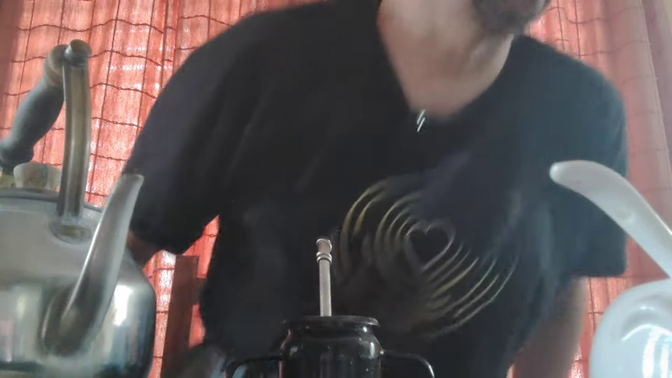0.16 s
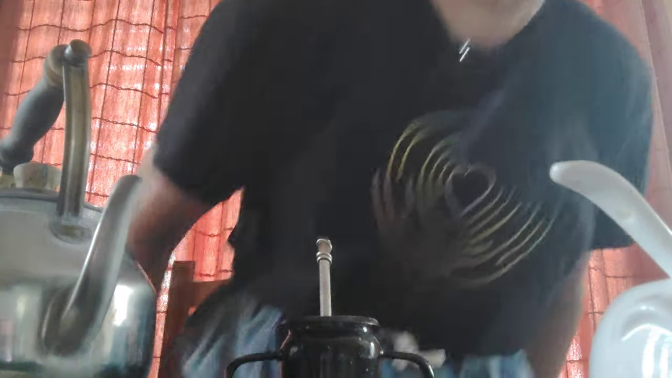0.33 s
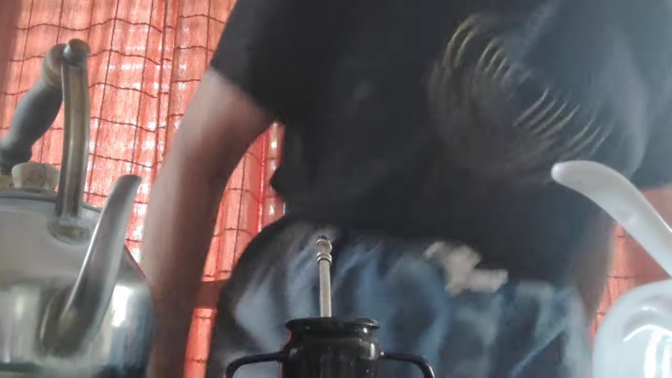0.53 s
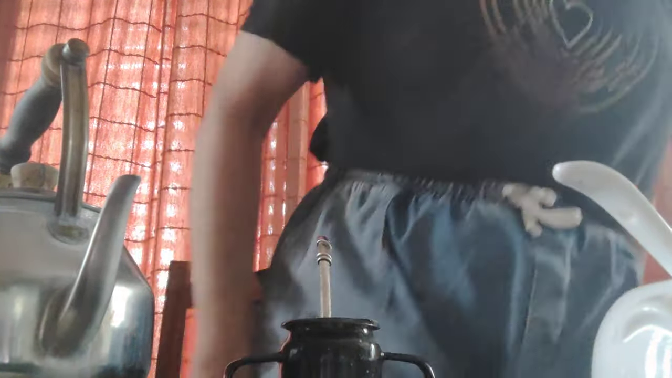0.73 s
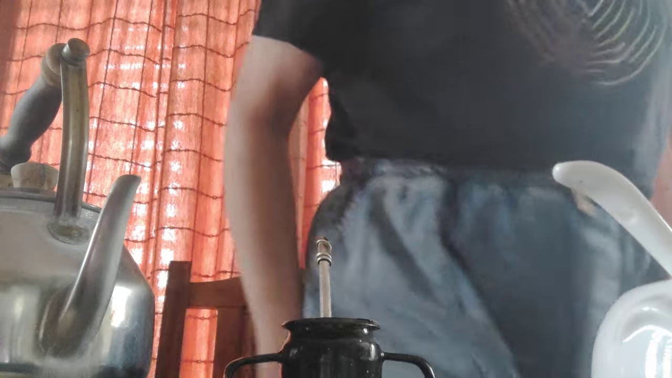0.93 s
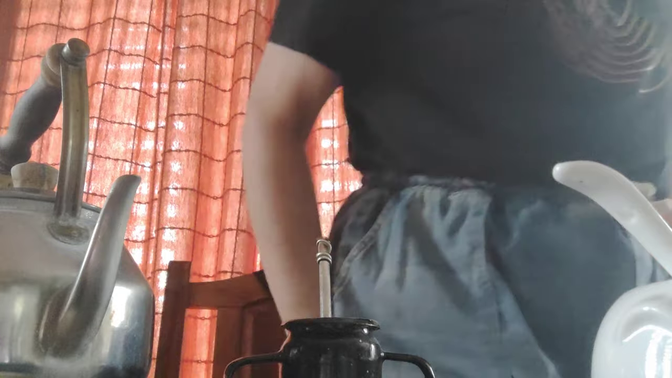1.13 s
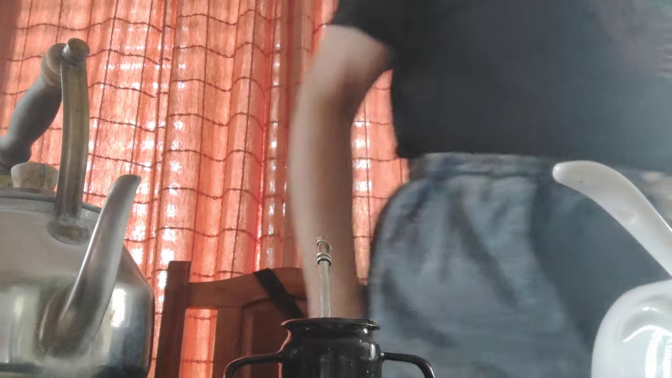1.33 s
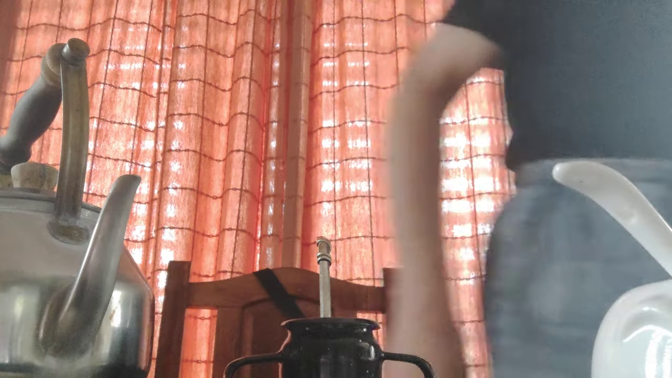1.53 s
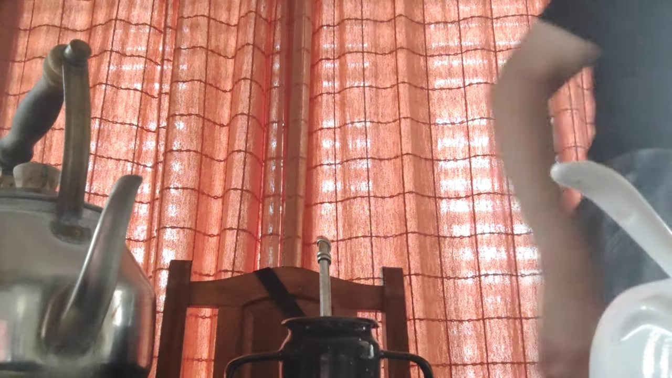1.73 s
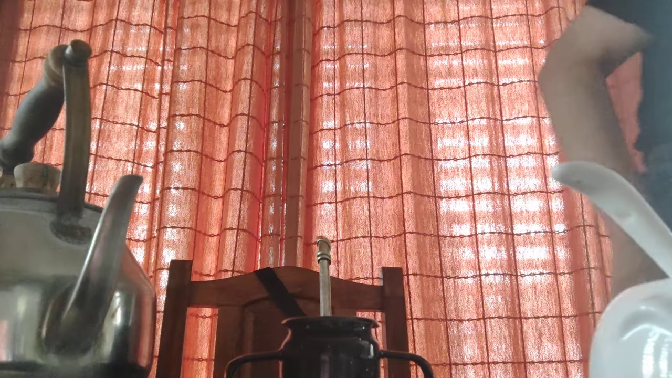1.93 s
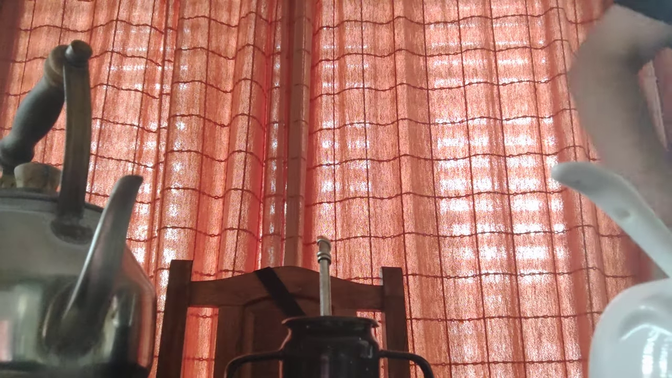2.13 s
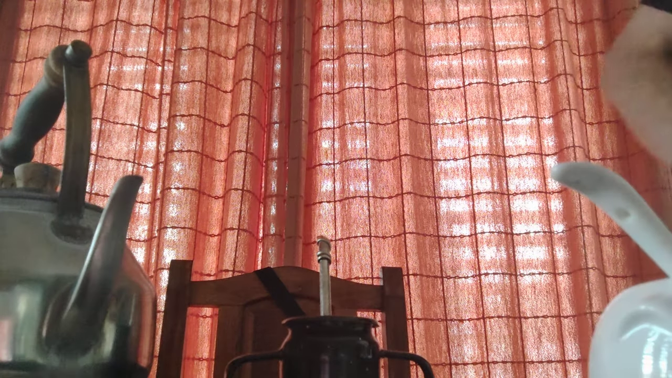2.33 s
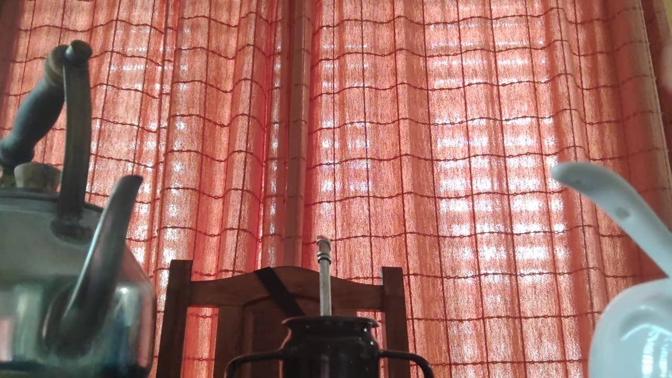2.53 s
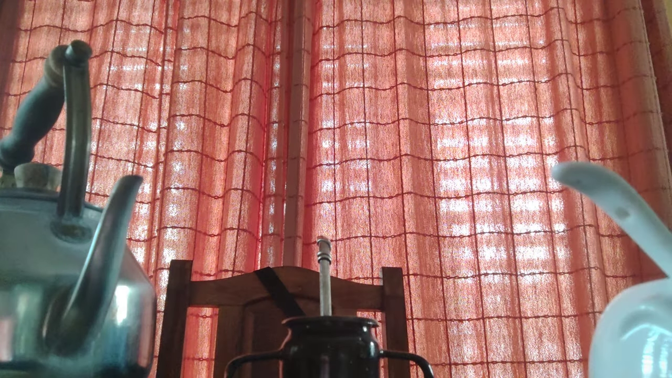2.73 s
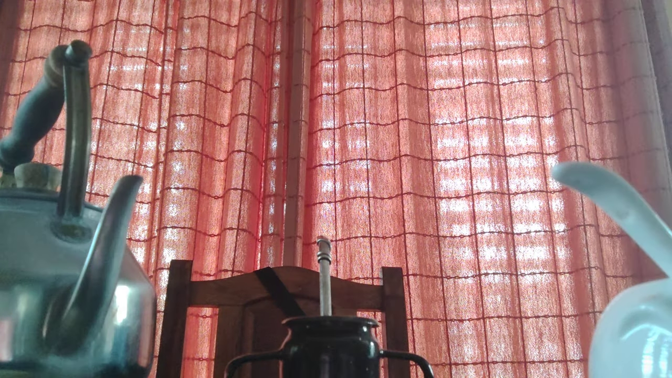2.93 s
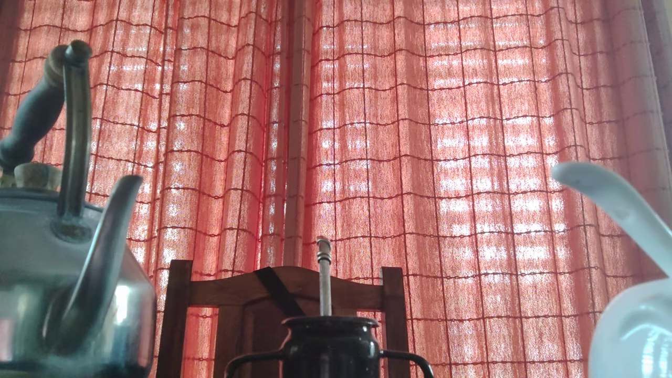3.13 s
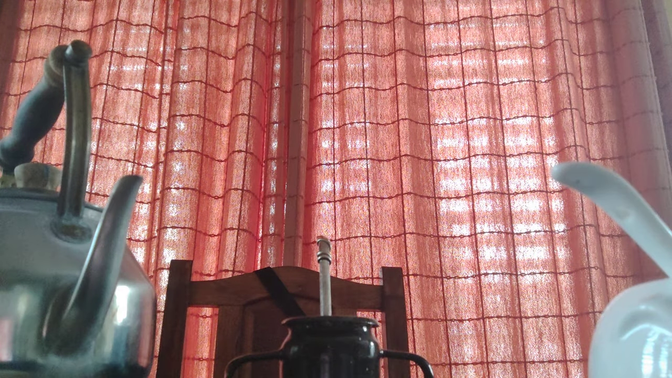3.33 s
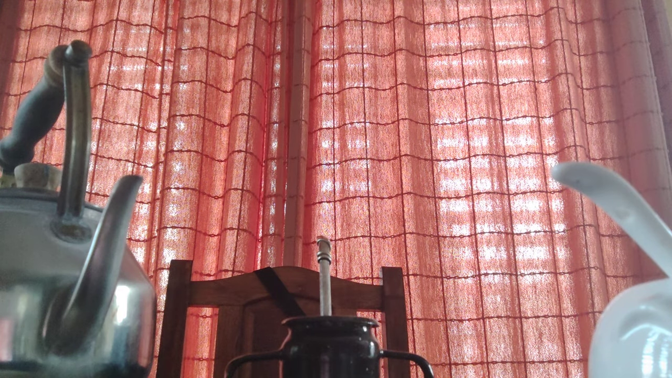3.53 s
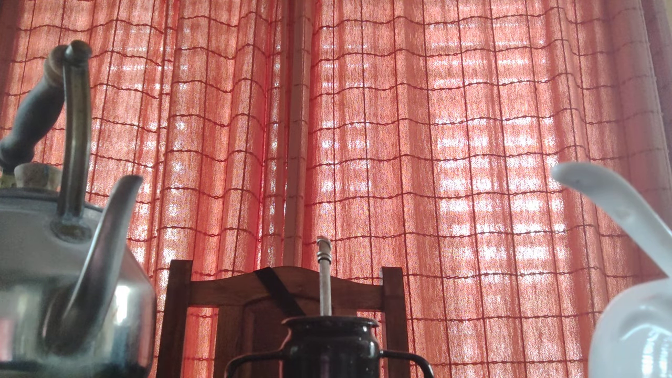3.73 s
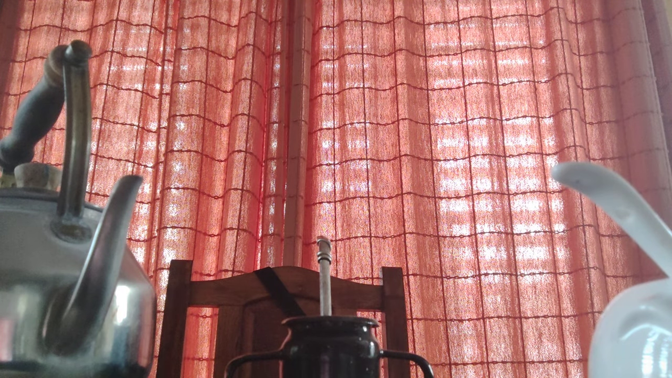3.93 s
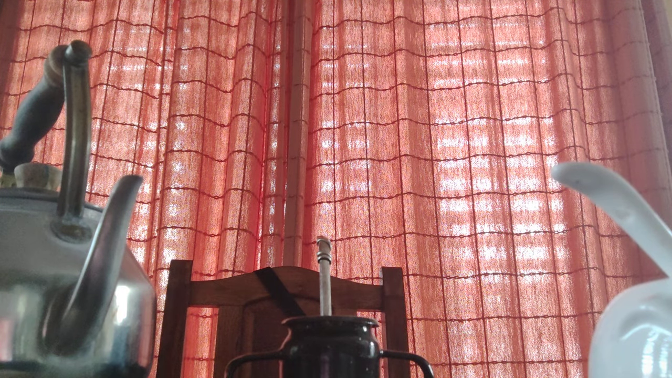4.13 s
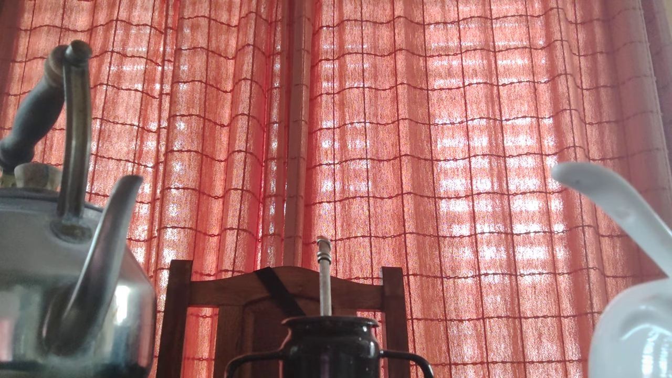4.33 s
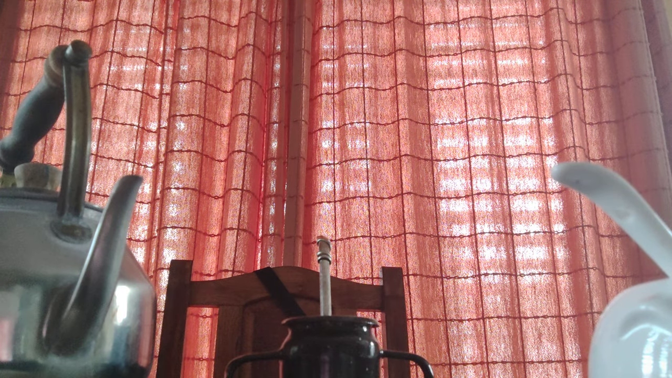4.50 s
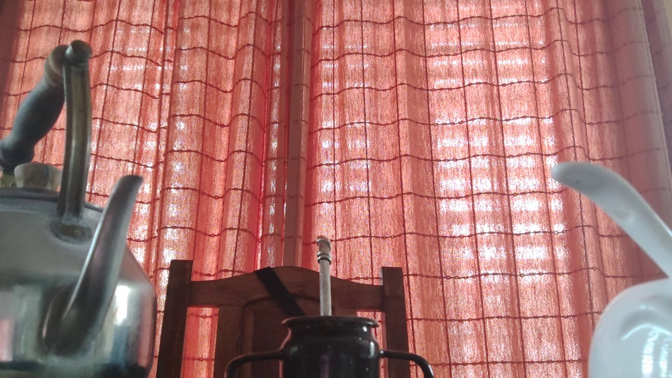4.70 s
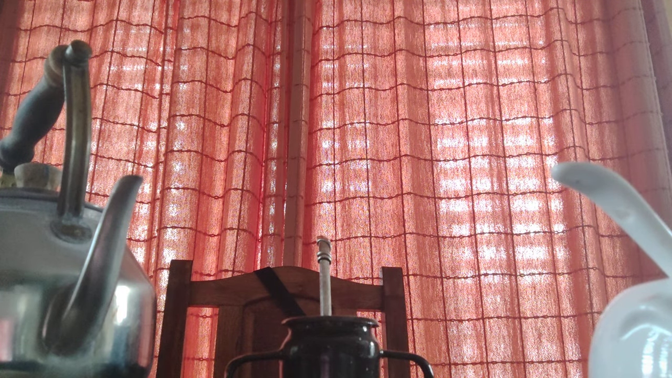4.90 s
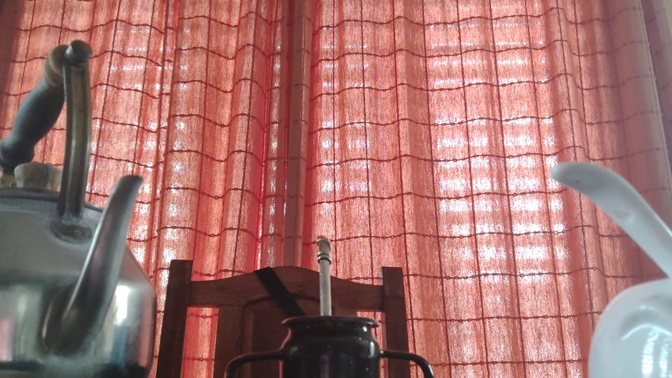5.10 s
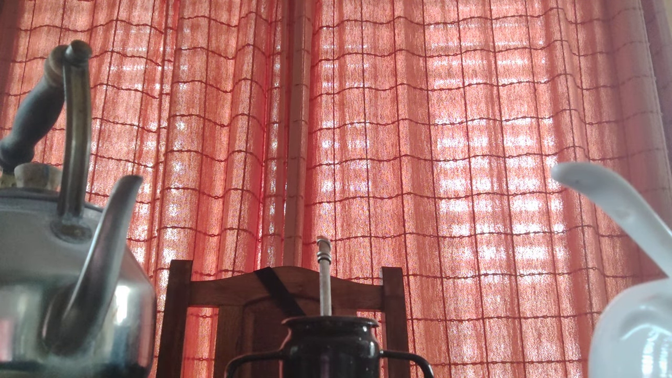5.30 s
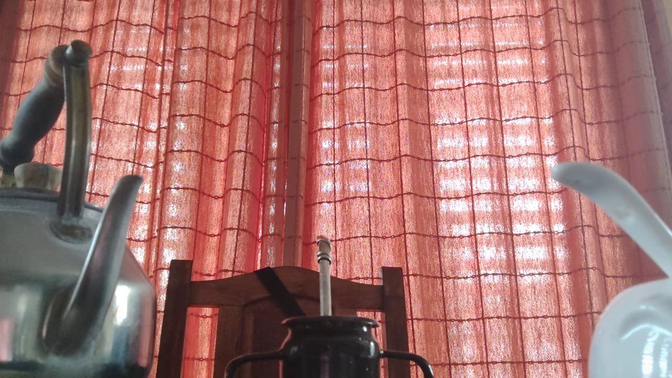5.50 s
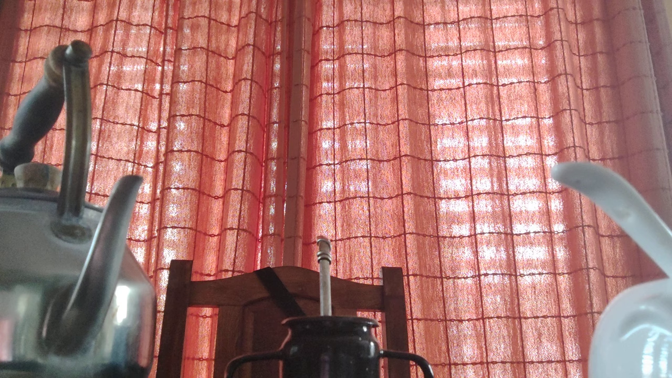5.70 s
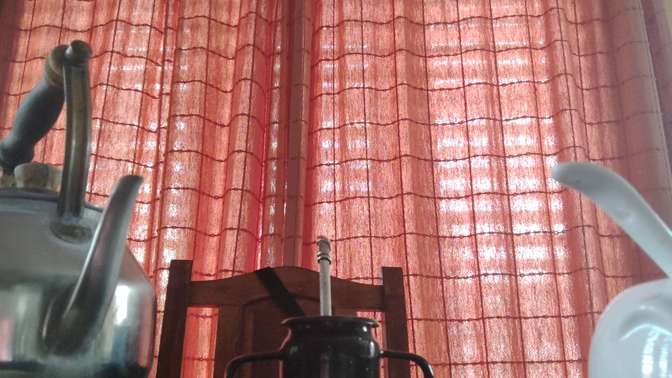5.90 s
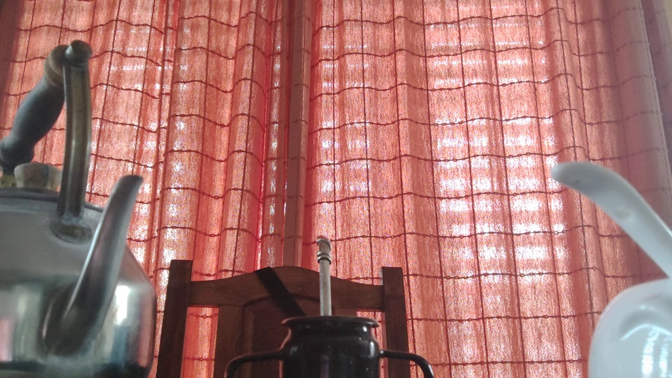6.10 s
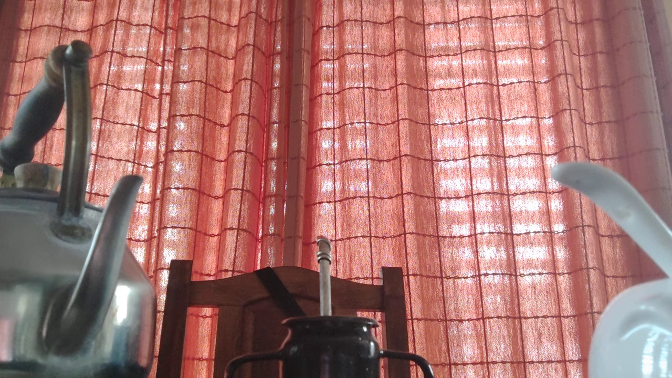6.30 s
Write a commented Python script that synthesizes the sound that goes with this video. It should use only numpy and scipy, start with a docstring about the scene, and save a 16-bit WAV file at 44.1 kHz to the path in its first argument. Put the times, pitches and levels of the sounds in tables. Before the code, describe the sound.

In a small furnished room, a wooden chair is shoved back right away: a burst of hard, hollow knocks, a floor thump, short scrape, cloth rustle and tiny ticks. Lighter steps and bumps follow as the person leaves. Then isolated faint wooden knocks sound over a soft low appliance hum, caught by a close stereo microphone with short room echo.

```python
"""A wooden chair is shoved back over the floor as a person rises and walks off to one side of a furnished room.
Stick-slip jerks and blows excite the modes of frame and boards; shaped noise makes cloth, soles and grit.
Ticks, thumps and scuffs add detail, and far knocks follow over the soft hum of an appliance.
Random echo tails form the room, and two microphone ports a hand apart pick it up."""
import sys
import numpy as np
from scipy import signal
from scipy.fft import rfft, irfft
from scipy.io import wavfile
from scipy.ndimage import uniform_filter1d

SR = 44100
rng = np.random.default_rng(int(sys.argv[2]) if len(sys.argv) > 2 else 0)


def unload_wav(signal):
    """Save mono or channel-first audio to the path in sys.argv[1] as 16-bit WAV at rate SR, clipped to [-1, 1]."""
    wavfile.write(
        sys.argv[1],
        SR,
        np.round(np.clip(np.atleast_2d(signal).T, -1, 1) * 32767).astype(np.int16),
    )


N = 284577

# Modes of the floor boards. Each row: frequency in Hz, width in Hz, relative level in dB.
BOARD_MODES = [(129.8, 25, -2), (153.4, 10.3, -10), (185.2, 7.5, -1), (223, 46, 1), (277, 60, -1)]
# Modes of the chair frame. Each row: frequency in Hz, width in Hz, relative level in dB.
FRAME_MODES = [(340.9, 37, -6), (442, 48, -2), (486, 44, -3), (591, 47, -3), (668, 41, -2.5),
               (820, 163, -3), (929, 30, -7.5), (1060, 314, -4.5), (1217, 200, -8)]
# Spectrum of cloth and soles. Each row: frequency in Hz, relative density in dB per Hz.
RUSTLE_SPECTRUM = [(820, -6), (1400, -7), (1520, -4), (1940, -4), (2200, -7), (2540, -6), (3210, -13.5),
                   (3300, -10), (5500, -19), (7150, -29), (12100, -120)]
# Spectrum of fine grit. Each row: frequency in Hz, relative density in dB per Hz.
GRIT_SPECTRUM = [(3200, -4), (5500, -5.5), (7500, -8.5), (9500, -8), (12000, -10), (15600, -15.5)]


def moving():
    """Stick-slip friction: irregular jerks excite the modes of boards and frame; denser ones hiss as cloth and grit."""
    boards_drive, frame_drive, rustle_drive, grit_drive = efforts()
    boards = boards_drive * evened(ring(slips(300, 2.02), BOARD_MODES))
    frame = frame_drive * evened(ring(slips(700, 2.8), FRAME_MODES))
    rustle = rustle_drive * evened(coloured(slips(5000, 4.5), RUSTLE_SPECTRUM))
    grit = grit_drive * evened(coloured(slips(9000, 2.2), GRIT_SPECTRUM))
    return boards + frame + rustle + grit


# Shoves, steps and shuffles. Each row: peak time in seconds, rise in seconds, hold in seconds,
# fade t60 in seconds, then the drives of boards, frame, rustle and grit in dB.
MOVES = [(0.142, 0.037, 0.0026, 0.076, -34.5, -29, -34, -44),
         (0.159, .02, 0.019, 0.42, -44, -37.5, -42, -53.5),
         (0.348, 0.047, 0.0054, 0.31, -38, -30.5, -37, -46.5), (0.409, .1, 0.077, 0.13, -46, -45, -50, -54),
         (0.519, .01, 0.054, 0.15, -55.5, -46, -48, -58), (0.957, 0.098, .01, .25, -52.5, -63, -67, -66),
         (1.009, 0.056, 0.005, 0.34, -52, -48.5, -55.5, -54), (1.132, .04, .005, 0.34, -62, -62, -71, -75),
         (1.636, 0.014, .004, 0.26, -62, -62, -65.5, -65), (1.827, 0.1, 0.08, 0.34, -64, -61.5, -72.5, -93),
         (2.762, 0.022, .01, 0.68, -63, -65.5, -84, -76.5),
         (2.85, 0.11, 0.037, 3.3, -59.5, -67.5, -82, -78.5),
         (3.34, 0.081, 0.011, 0.28, -53.5, -48, -65.5, -68.5),
         (3.47, .04, 0.0045, 0.089, -66.5, -69, -85, -87),
         (3.89, 0.073, 0.056, 0.66, -76, -69.5, -95, -74.5), (3.947, 0.062, .005, 0.61, -60, -66, -80, -85),
         (4.065, 0.07, 0.033, .7, -63.5, -67, -78, -80.5), (4.398, 0.06, 0.043, 0.21, -49, -48, -64.5, -72),
         (5, 0.12, 0.064, 1, -62.5, -65, -79, -76.5), (5.648, 0.015, 0.0044, 0.083, -54, -51.5, -90, -83),
         (5.68, .03, 0.045, 0.52, -64.5, -65.5, -75.5, -84), (6.338, 0.033, .01, .5, -74, -95, -92, -82)]
# Small stirring under the moves. Each row: time in seconds, drive of the frame in dB, drive of the rustle in dB.
STIRRING = [(0, -68, -67.5), (.1, -61.5, -75), (.3, -56, -61), (.65, -64, -70), (.9, -65, -76.5),
            (1.2, -67, -76.5), (1.4, -71, -79), (1.6, -68, -74.5), (1.95, -70.5, -77.5), (2.15, -75, -81),
            (2.6, -79.5, -86.5), (3.2, -96, -91), (3.45, -69, -79), (3.7, -76, -99), (4.3, -76.5, -87),
            (4.55, -68, -79), (4.9, -76.5, -85.5), (5.4, -78, -90.5), (5.9, -74, -87), (6.2, -100, -103),
            (6.45, -95, -100)]
RISE_DB = 34.5  # climb over the rise time of a move
STIR_BOARDS_DB, STIR_GRIT_DB = 3.5, 1  # boards against frame, grit against rustle
WAVER_DB, WAVER_S = 1.5, .02  # depth and smoothing span of the random waver in the stirring


def efforts():
    """Addition of powers: moves that rise, hold and fade exponentially add to the wavering stirring in four drives."""
    step_s = .001
    t = np.arange(0, N / SR + .002, step_s)
    s, frame_db, rustle_db = np.transpose(STIRRING)
    frame_db, rustle_db = np.interp(t, s, frame_db), np.interp(t, s, rustle_db)
    noise = rng.standard_normal((2, len(t)))
    wavers = [evened(uniform_filter1d(row, round(WAVER_S / step_s))) for row in noise]
    stirring_db = [frame_db + STIR_BOARDS_DB + WAVER_DB * wavers[0],
                   frame_db + WAVER_DB * wavers[1],
                   rustle_db,
                   rustle_db + STIR_GRIT_DB]
    power = gain_of(stirring_db) ** 2
    for peak, rise, hold, t60, *levels_db in MOVES:
        rise_db = RISE_DB * np.minimum(t - peak, 0) / rise
        fade_db = -60 * np.maximum(t - peak - hold, 0) / t60
        shape_db = np.maximum(rise_db + fade_db, -200)
        power = power + gain_of(np.add.outer(levels_db, shape_db)) ** 2
    return [np.interp(np.arange(N) / SR, t, np.sqrt(row)) for row in power]


# Blows on wood. Each row: start in seconds, drive in dB, shudder t60 in seconds, time until the rattle stops
# in seconds, pitch of the struck part in Hz, drive of the boards relative to the blow in dB.
BLOWS = [(0.137, -17.5, 0.19, 0.066, 867, -29), (0.185, -22, 0.12, 0.018, 770, -21),
         (0.348, -18, 0.18, 0.13, 636, 12.5), (0.362, -15, 0.13, 0.12, 540, -30),
         (0.406, -29.5, 0.34, 0.048, 598, -23), (0.453, -20.5, 0.055, 0.066, 563, -13),
         (0.523, -39.5, 0.33, 0.1, 590, -23), (0.963, -33.5, 0.056, 0.051, 510, -20),
         (0.975, -35, 0.16, 0.028, 440, 5), (1.009, -40, 0.32, 0.1, 430, -10),
         (1.571, -45.5, 0.33, 0.095, 410, -13), (1.624, -42.5, 0.085, 0.056, 480, -7),
         (1.817, -50, 0.058, 0.056, 450, -3), (1.879, -55, 0.1, 0.05, 646, -12),
         (2.758, -42, 0.071, 0.04, 600, -26), (2.836, -52, .07, .03, 600, -20),
         (3.27, -38, 0.046, 0.046, 412, -8), (3.331, -30, 0.21, 0.056, 713, -21),
         (3.343, -28.5, 0.046, 0.039, 514, -13), (3.489, -53, 0.057, .03, 600, -13),
         (3.943, -49.5, 0.21, 0.054, 540, -4), (4.378, -36, 0.27, 0.023, 567, -22),
         (4.404, -28.5, 0.24, 0.04, 542, -5), (4.453, -34, 0.077, 0.045, 627, -9),
         (4.987, -39.5, 0.22, 0.085, 380, -14), (5.061, -50, .07, 0.027, 547, -15),
         (5.22, -50, 0.061, .03, 590, -15), (5.645, -45, 0.54, 0.17, 420, -14)]
JERK_DB = -19.5  # level of the jerks at a drive of 0 dB


def blows():
    """Impact excitation: a dying rattle of jerks that stops short rings frame and boards."""
    frame, boards = np.zeros(N), np.zeros(N)
    t = np.arange(SR // 5) / SR
    part_t = t[:220]
    for s, db, t60, held, hz, thud_db in BLOWS:
        at = round(s * SR)
        jerk = 4 * rng.standard_normal(len(t)) * (rng.random(len(t)) < .06)
        jerk[0] = 8  # the first contact
        decay_db = -60 * t / max(t60, .01)
        stop_db = -6300 * np.maximum(t - held, 0)
        shudder = jerk * gain_of(db + JERK_DB + decay_db + stop_db)
        # the struck part favours the modes near its pitch
        part = signal.windows.hann(len(part_t)) * np.sin(2 * np.pi * hz * part_t)
        frame[at:at + len(t)] += np.convolve(shudder, part / 16)[:len(t)]
        boards[at:at + len(t)] += shudder * gain_of(thud_db)
    return ring(frame, FRAME_MODES) + ring(boards, BOARD_MODES)


# Small ticks of joints and grit. Each row: start in seconds, ring drive in dB, pitch in Hz, t60 in seconds.
TICKS = [(0.1404, -32.5, 2850, 0.012), (0.3509, -35, 3220, 0.022), (0.4714, -32.5, 8600, 0.0076),
         (0.488, -49, 9000, 0.009), (0.496, -48, 8800, 0.013), (0.504, -42, 8550, 0.009),
         (.535, -38.5, 2715, 0.039), (0.555, -36, 5460, 0.0039), (1.6322, -52.5, 2700, 0.0085),
         (1.6336, -55, 6440, 0.014), (5.02, -65, 10000, .01)]


def ticks():
    """Damped oscillation: a decaying sine rings under a short click of noise in the band around it."""
    out, t = np.zeros(N), np.arange(600) / SR
    for s, db, hz, t60 in TICKS:
        band = signal.butter(1, [0.87 * hz, 1.93 * hz], "band", fs=SR, output="sos")
        click = signal.sosfilt(band, rng.standard_normal(len(t))) * gain_of(-60 * t / 0.0049)
        tick = np.sin(2 * np.pi * hz * t) * gain_of(-60 * t / t60) + 1.5 * click
        out[round(s * SR):][:len(t)] += gain_of(db) * tick
    return out


# Dull thumps of weight on the floor. Each row: start in seconds, drive in dB, pitch in Hz, number of cycles.
THUMPS = [(0.137, -41, 121.6, 5.7), (0.329, -26.5, 120, 3.4), (0.461, -43, 126.5, 2.7),
          (0.642, -49.5, 128, 7), (0.989, -47, 122, 5.3), (1.072, -33, 265, 0.77), (1.145, -41.5, 176, 2)]


def thumps():
    """Tone burst: a few low cycles swell and die under half a sine arch."""
    out = np.zeros(N)
    for s, db, hz, cycles in THUMPS:
        turn = np.arange(0, cycles, hz / SR)  # cycles elapsed
        arch = np.sin(np.pi * turn / cycles)
        out[round(s * SR):][:len(turn)] -= gain_of(db) * np.sin(2 * np.pi * turn) * arch
    return out


# Soles and legs scuffing the floor. Each row: start in seconds, length in seconds, drive in dB,
# centre of the resonance in Hz, its width in Hz.
SCUFFS = [(0.551, 0.079, -49, 4740, 2500), (1.624, 0.17, -67, 3440, 2500), (3.951, 0.079, -70.5, 1820, 300),
          (4.1, 0.2, -73, 2210, 1300), (4.375, 0.15, -64.5, 1720, 796), (6.33, 0.11, -83, 3000, 1200)]


def scuffs():
    """Friction noise: dense jerks of grit pass one broad resonance, quick to start and fading."""
    out, grit = np.zeros(N), slips(7400, 2.5)
    for s, length, db, hz, width in SCUFFS:
        at = round(s * SR)
        u = np.arange(0, 1, 1 / (length * SR))  # fraction of the scuff elapsed
        band = signal.butter(2, [hz - width / 2, hz + width / 2], "band", fs=SR, output="sos")
        rub = evened(signal.sosfilt(band, grit[at:at + len(u)]))
        out[at:at + len(u)] += gain_of(db) * rub * np.minimum(u / 0.041, 1) * (1 - u) ** 0.98
    return out


LEAVING_S, FAR_S, FAR_HZ = 2.3, 4.55, 143  # span of the walk away; far boards pass little below FAR_HZ


def distance(x):
    """Structure-borne loss: only near boards carry the deepest notes, so these fade as the walker leaves."""
    far = signal.sosfiltfilt(signal.butter(2, FAR_HZ, "high", fs=SR, output="sos"), x)
    away = np.interp(np.arange(N) / SR, (LEAVING_S, FAR_S), (0, 1))
    return (1 - away) * x + away * far


def room(x):
    """Reverberation: three random sets of echo paths blend in a cycle nine times a second."""
    x = signal.sosfilt(signal.butter(4, 100, "high", fs=SR, output="sos"), x)  # boards radiate little deep bass
    turn = 2 * np.pi * 9. * np.arange(N) / SR
    echoed = np.zeros((2, N))
    for k in range(3):
        share = np.cos(turn / 2 + k * np.pi / 3) ** 2
        echoed += signal.fftconvolve((x * share)[None], tails(), axes=1)[:, :N]
    a, b = echoed
    return ports(a, gain_of(2.0) * b) * gain_of([[-.3], [.3]])  # tilts the balance to the right port


# Reverberation time of the room. Each row: frequency in Hz, t60 in seconds.
ROOM_T60 = [(100, 0.53), (600, 0.34), (3000, 0.39), (12000, 0.14)]


def tails():
    """Frequency-dependent decay: two sparse tails of random taps; the first also holds the direct sound."""
    taps = rng.choice([-1., 1.], (2, SR // 2)) * (rng.random((2, SR // 2)) < .05)
    taps[:, :150] = 0  # gap before the first echoes
    hz, t, bands = signal.stft(taps, SR, nperseg=256)
    t60 = np.maximum(read(ROOM_T60, hz), .03)[:, None]
    tail = signal.istft(bands * gain_of(-60 * t / t60), SR, nperseg=256)[1]
    tail *= gain_of(-6.0) / np.linalg.norm(tail[0])
    tail[0, 0] += 1  # direct sound
    # a short dense burst gives the second tail an even early spectrum
    burst = rng.standard_normal(1500) * np.exp(-np.arange(1500) / 450)
    tail[1, :len(burst)] += burst / np.linalg.norm(burst)
    return tail / np.linalg.norm(tail, axis=1, keepdims=True)


# Likeness of the two ports. Each row: frequency in Hz, correlation from -1 to 1 without a unit.
LIKENESS = [(60, 0.95), (250, 0.87), (600, 0.33), (950, 0.3), (1330, -0.79), (1700, -0.0058), (2300, 0.15),
            (4000, 0.21), (12000, -0.061)]
PORT_LEAD = 3  # samples by which the left port hears sooner


def ports(a, b):
    """Diffuse-field coherence: two spaced ports agree in the bass and oppose where the gap is half a wave."""
    same = np.clip(read(LIKENESS, np.fft.rfftfreq(N, 1 / SR)), -1, 1)
    right = irfft(same * rfft(a) + np.sqrt(1 - same ** 2) * rfft(b), N)
    return np.array([np.roll(a, -PORT_LEAD), right])


# Spectrum of the room tone. Each row: frequency in Hz, relative density in dB per Hz.
AIR_SPECTRUM = [(15, -48), (25, -10.5), (53, -46), (183, 3), (290, -3.5), (369, -6), (483, -12.5),
                (584, -15), (785, -16), (851, -14.5), (1310, -22), (1860, -24), (6410, -30), (14400, -32.5),
                (15600, -38)]
# Tones of a distant motor. Each row: frequency in Hz, width of the wavering in Hz, level in dB.
HUM = [(48.7, 15, -88.5), (101, 12, -85), (154, 9.3, -78), (184.6, 3.2, -71), (235, 5.4, -85.5),
       (294.8, 2.1, -67.5), (558, 2.5, -81.5)]
AIR_DB = -66  # room tone at 5 s, before its swell


def air():
    """Shaped and modulated noise: room tone swells and settles beside the narrow wavering tones of a distant motor."""
    t = np.arange(N) / SR
    swell = evened(sum(np.sin(2 * np.pi * (f * t + rng.random())) / np.sqrt(f) for f in np.geomspace(.5, 12, 20)))
    level = gain_of(AIR_DB + .5 * swell - 0.12 * (t - 5.0))
    a, b = (level * evened(coloured(rng.standard_normal(N), AIR_SPECTRUM)) for _ in range(2))
    for hz, width, db in HUM:
        noise = rng.standard_normal(N) + 1j * rng.standard_normal(N)
        waver = signal.lfilter([1], [1, -np.exp(-np.pi * width / SR)], noise)
        tone = (1 + 0.77 * waver / np.std(waver)) * np.exp(2j * np.pi * hz * t)
        a += gain_of(db) * evened(tone.real)
    return ports(a, b)


def slips(per_s, spread_db):
    """Stick-slip: jerks of random time, sign and uneven size, scaled to rms 1."""
    size = gain_of(spread_db * np.minimum(rng.exponential(1, N), 4)) * rng.choice([-1., 1.], N)
    return evened(size * (rng.random(N) < per_s / SR))


def ring(x, modes):
    """Modal superposition: passes x through exponentially decaying modes of alternating sign."""
    t = np.arange(SR // 8) / SR
    body = np.zeros(len(t))
    for k, (hz, width, db) in enumerate(modes):
        decay = np.exp(-np.pi * width * t)
        body += (-1) ** k * gain_of(db) * np.sqrt(width) * decay * np.sin(2 * np.pi * hz * t)
    return signal.oaconvolve(x, body / np.linalg.norm(body))[:N]


def coloured(x, points):
    """Linear filtering: multiplies the spectrum of x by a gain curve."""
    return irfft(rfft(x) * gain_of(read(points, np.fft.rfftfreq(N, 1 / SR))), N)


def read(points, hz):
    """Interpolation of a curve on a log-frequency axis."""
    f, value = np.transpose(points)
    return np.interp(np.log(hz + 1), np.log(f + 1), value)


def evened(x):
    """Normalisation of the mean power: scales to rms 1."""
    return x / np.sqrt(np.mean(x ** 2) + 1e-20)


def gain_of(db):
    """Logarithmic level: decibels to an amplitude factor."""
    return 10 ** (np.asarray(db) / 20)


def scene():
    """Superposition: everything that moves sounds through the room, over the room tone."""
    sources = moving() + blows() + ticks() + thumps() + scuffs()
    return room(distance(sources)) + air()


def record(dry):
    """Band limiting: small microphones lose the deep bass, a low-pass cuts the top, and converter noise is added."""
    thin = signal.sosfilt(signal.butter(2, 25, "high", fs=SR, output="sos"), dry)
    low_pass = signal.firwin(1023, 15750, window=("kaiser", 9), fs=SR)
    cut = signal.oaconvolve(thin, low_pass[None], "same")
    return cut + gain_of(-106) * rng.standard_normal(dry.shape)


dry = scene()
out = record(dry)
unload_wav(out)
```